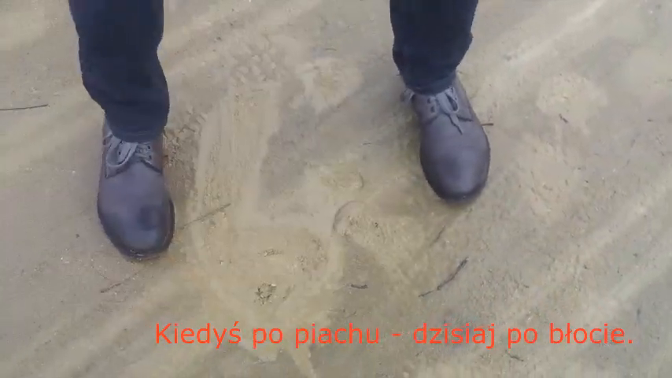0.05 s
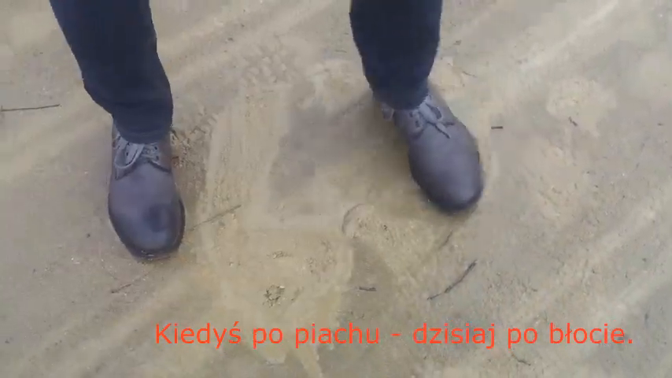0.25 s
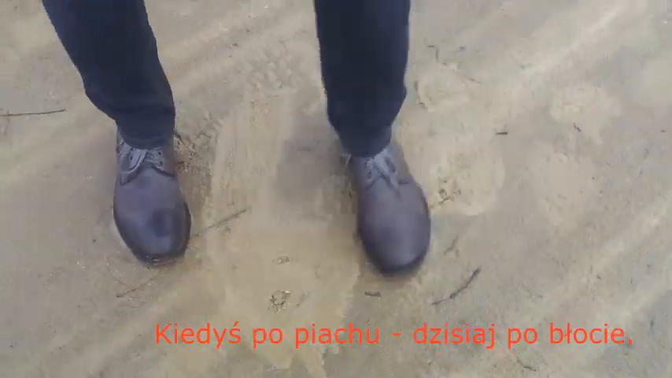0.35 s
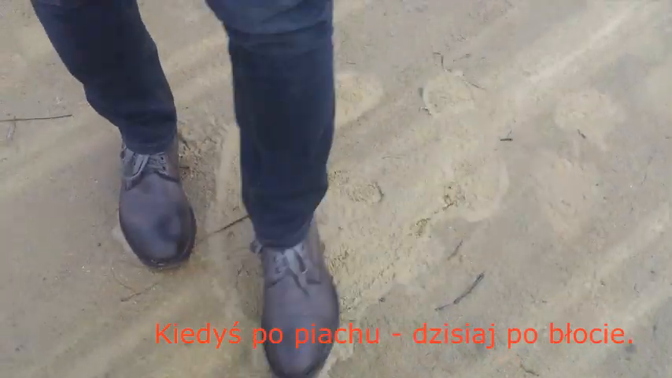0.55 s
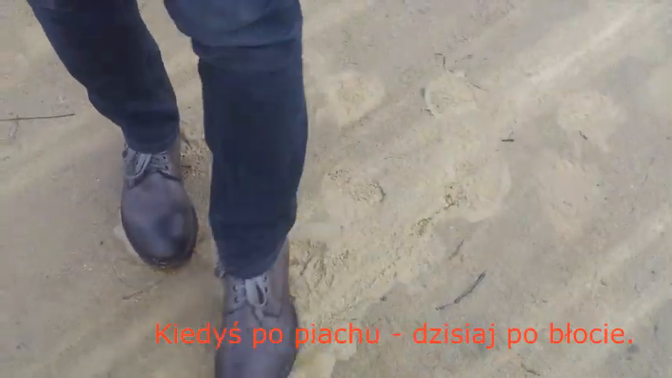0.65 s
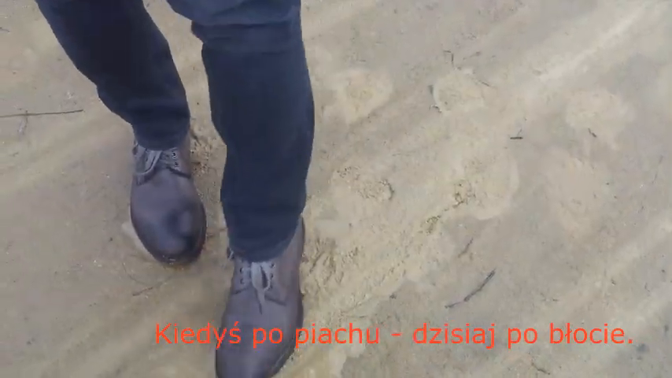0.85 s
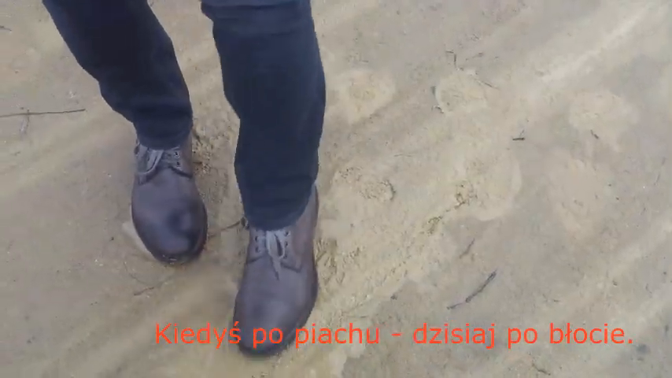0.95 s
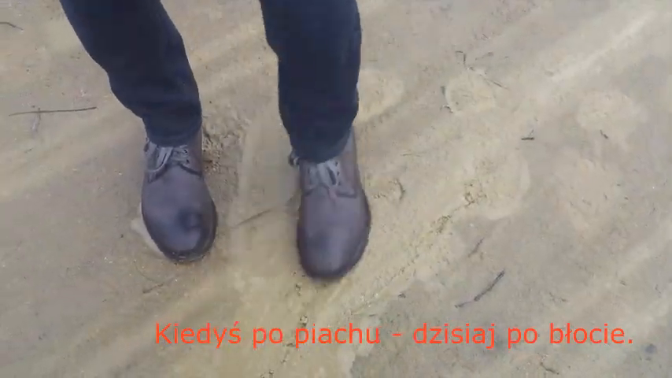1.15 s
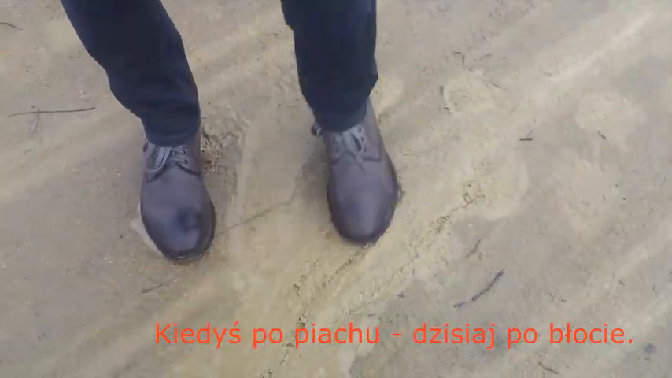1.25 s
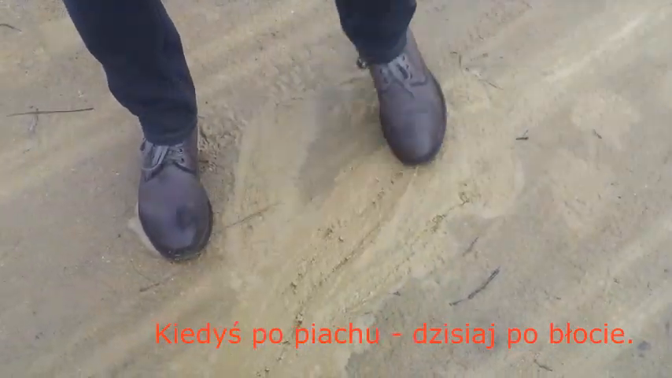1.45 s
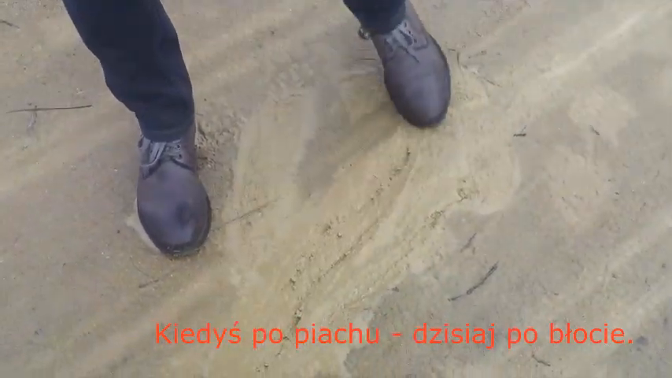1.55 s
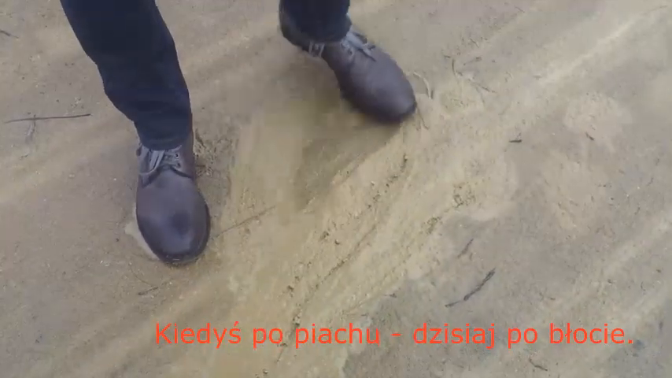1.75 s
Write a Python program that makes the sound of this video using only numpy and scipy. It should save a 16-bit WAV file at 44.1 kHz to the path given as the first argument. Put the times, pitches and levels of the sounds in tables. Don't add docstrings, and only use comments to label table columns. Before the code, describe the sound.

A shoe sole scrapes wet sand on paving, outdoors, very close in stereo. Quiet traffic hum until a light landing near 0.2 s, then a bright, crunchy drag at 0.26-0.4 s, weakening through 0.7 s. After a lull, grinding rebuilds from 0.9 s, with a sharp pebble crack at 1.12 s and gritty hissing until 1.5 s. Faint drops tick at 1.6-1.72 s; hum remains.

```python
import sys
import numpy as np
from scipy import signal
from scipy.fft import rfft, irfft, next_fast_len
from scipy.io import wavfile
from scipy.ndimage import map_coordinates

SR = 44100
rng = np.random.default_rng(int(sys.argv[2]) if len(sys.argv) > 2 else 0)


def log_audio(samples):
    frames = np.atleast_2d(samples).T
    limited = np.clip(frames, -1, 1)
    pcm = np.round(limited * 32767).astype(np.int16)
    wavfile.write(sys.argv[1], SR, pcm)


def volts_from_decibels(level):
    exponent = np.asarray(level, float) / 20
    return 10 ** exponent


N = 79380


def unit(x):
    return x / np.sqrt(np.mean(x ** 2) + 1e-20)


def along(points, hz):
    f, v = np.transpose(points)
    return np.interp(np.log(hz + 1), np.log(f + 1), v)


def curves(rows):
    s, *cols = np.transpose(rows)
    t = np.arange(N) / SR
    outside_s = np.maximum(s[0] - t, 0) + np.maximum(t - s[-1], 0)
    return [np.interp(t, s, c) for c in cols] + [-150 * outside_s]


def wobble(rate):
    knots = rng.standard_normal(int(N * rate / SR) + 4)
    return map_coordinates(knots, [np.arange(N) * rate / SR])


def filtered(x, response):
    m = next_fast_len(N + SR // 4)
    return irfft(rfft(x, m) * response(np.fft.rfftfreq(m, 1 / SR)), m)[..., :N]


def shaped(x, spectrum):
    return unit(filtered(x, lambda hz: volts_from_decibels(along(spectrum, hz))))


def spread(x, own):
    z = signal.stft(x, nperseg=256)[2]
    shifted = z * np.exp(2j * np.pi * rng.random(z.shape))
    alone = signal.istft(shifted, nperseg=256)[1][:, :N] * 1.51

    def share(hz):
        return np.clip(along(own, hz), 0, 1)

    return filtered(x, lambda hz: np.sqrt(1 - share(hz) ** 2)) + filtered(alone, share)


# time_s, right_port_lag_s
SHOE_LAG = [(0.2, 2e-5), (0.6, -5e-6), (1.0, -2.5e-5), (1.4, -5e-6)]


def grains(s, gain, hz, cycles, size):
    out, at = [], np.arange(size)
    lag = np.interp(s, *np.transpose(SHOE_LAG))
    for start in (s - lag / 2, s + lag / 2):
        first = np.ceil(start * SR).astype(int)
        place = first[:, None] + at
        turns = hz[:, None] * (place / SR - start[:, None])
        decay = volts_from_decibels(-60 * turns / (3 * cycles))
        wave = gain[:, None] * np.sin(2 * np.pi * turns) * decay
        out.append(np.bincount(np.clip(place, 0, N).ravel(), wave.ravel(), N + 1)[:N])
    return np.array(out)


def scatter(rate, size_db):
    u = rng.random((int(rate * N / SR), 3))
    times = u[:, 0] * N / SR
    sizes = volts_from_decibels(-size_db * np.log(u[:, 1] + 0.0088))
    bell = np.log(u[:, 2] / (1 - u[:, 2]) + 1e-9) / 1.54
    return times, sizes, bell


# time_s, grit_db, mud_over_grit_db, fizz_over_grit_db
STROKES = [(0.0, -48.5, -5.5, -16), (0.21, -37.5, -10.5, -44), (0.262, -19.5, -13, -68),
           (0.362, -22.5, -15, -21), (0.4, -24.5, -11.5, -51), (0.526, -27, -16.5, -26),
           (0.575, -31, -8, -20), (0.7, -31.5, -13.5, -24), (0.736, -42.5, -12, -30),
           (0.88, -31, -13.5, -26), (0.96, -27.5, -14, -23), (1.13, -21.5, -26.5, -27),
           (1.24, -23.5, -14.5, -30), (1.31, -21, -15, -24.5), (1.41, -25, -16, -21),
           (1.455, -25, -15, -16), (1.52, -32.5, -11.5, -10), (1.69, -48.5, -10, -21)]
# freq_hz, level_db
SAND_SPECTRUM = [(300, -33), (1200, -13), (3300, -7.5), (4600, -3), (6200, -0.5), (8500, -9), (11000, -20),
                 (12500, -55)]
MUD_SPECTRUM = [(60, -17), (110, -11.5), (228, 0.5), (336, -9), (550, -4.5), (900, -5.5), (1500, -8.5),
                (3000, -51)]
FIZZ_SPECTRUM = [(7000, -21), (9000, 0.5), (11000, 3), (13000, -4), (15000, -7)]


def sand():
    grit_db, mud_db, fizz_db, fade_db = curves(STROKES)
    s, gain, z = scatter(9000, size_db=2)
    crack_hz = np.clip(6500 * np.exp(0.394 * z), 800, 15000)
    cracks = unit(grains(s, gain, crack_hz, cycles=2.2, size=128))
    surge_db = bursts() + 0.4 * wobble(45.07) + 0.8 * wobble(120)
    hiss = 0.55 * cracks + 0.45 * rng.standard_normal(N)
    grit = shaped(hiss * volts_from_decibels(surge_db), SAND_SPECTRUM)
    fizz = shaped(hiss * volts_from_decibels(1.6 * surge_db + 0.42 * wobble(13)), FIZZ_SPECTRUM)
    rub = shaped(rng.standard_normal(N) * volts_from_decibels(0.71 * surge_db + 1.8 * wobble(40.6)), MUD_SPECTRUM)
    mix = volts_from_decibels(-5) * grit + volts_from_decibels(mud_db - 0.5) * rub + volts_from_decibels(fizz_db - 0.5) * fizz
    return volts_from_decibels(grit_db + fade_db) * mix


# time_s, level_db, pitch_hz
ARCH_GAP = [(0.19, -44, 1270), (0.235, -31, 1260), (0.262, -22, 2220), (0.354, -19.5, 2350),
            (0.39, -38, 1870), (0.525, -23.5, 2430), (0.555, -28, 1710), (0.635, -32, 1740),
            (0.69, -22, 2560), (0.736, -45, 2570), (0.79, -37, 2370), (0.865, -35.5, 1370),
            (0.89, -25.5, 2540), (1.0, -30.5, 2430), (1.04, -26.5, 2440), (1.15, -21, 2170),
            (1.165, -29.5, 2180), (1.4, -42.5, 2250)]


def arch():
    level_db, pitch_hz, fade_db = curves(ARCH_GAP)
    s, gain, z = scatter(1500, size_db=0.5)
    gap_hz = (pitch_hz * np.exp(0.031 * wobble(45)))[(s * SR).astype(int)]
    at_heel = rng.random(len(s)) < 0.25
    hz = np.where(at_heel, 2350, gap_hz) * np.exp(0.067 * z)
    ring = grains(s, gain, hz, cycles=12.2, size=512)
    ring = unit(ring * volts_from_decibels(1.1 * wobble(53.84) + 0.9 * wobble(130)))
    return volts_from_decibels(level_db + fade_db - 3) * ring


# freq_hz, share
SOLE_OWN = [(100, 0.28), (1000, 0.43), (2200, 0.12), (3500, 0.88), (6000, 0.5), (9000, 1), (13000, 0.85)]


def sole():
    return spread(sand() + arch(), SOLE_OWN)


def breaks(rows, gain_db, cycles, crack_db):
    s, db, hz = np.transpose(rows)[..., None]
    u = rng.random((len(rows), 3, 5))
    periods = np.round(0.0015 * hz * (np.arange(5) / 5 - 1))
    at = (s + periods / hz).ravel()
    gain = volts_from_decibels(db + gain_db - 3.05 * u[:, 0]).ravel()
    knock_hz = (hz * np.exp(0.12 * (u[:, 1] - 0.5))).ravel()
    crack_hz = 2500 + 9000 * u[:, 2].ravel()
    ring = grains(at, gain, knock_hz, cycles, size=400)
    return ring + volts_from_decibels(crack_db) * grains(at, gain, crack_hz, 1.8, size=64)


# time_s, peak_db, pitch_hz
GRIT_CRACKS = [(0.2605, -13, 5900), (0.2695, -12, 5770), (0.2873, -13, 6240), (0.2941, -9, 5740),
               (0.2995, -12, 6010), (0.3179, -12, 6200), (0.342, -16, 6930), (0.3497, -11, 6970),
               (0.363, -16, 6970), (0.3675, -8, 6150), (0.3755, -17, 6200), (0.5078, -17, 6160),
               (0.5212, -13, 6130), (0.5286, -19, 6500), (0.5444, -19, 5730), (0.5524, -21, 6640),
               (0.6083, -20, 5710), (0.6164, -22, 6650), (0.6228, -25, 6550), (0.667, -20, 6450),
               (0.6805, -20, 5880), (0.6989, -25, 5710), (0.8956, -26, 5870), (0.9053, -27, 5930),
               (0.9536, -20, 5850), (0.9626, -20, 5880), (0.9752, -18, 4670), (0.9809, -19, 5560),
               (0.9928, -15, 5560), (1.0005, -19, 5580), (1.0105, -17, 6600), (1.0197, -17, 5460),
               (1.0285, -12, 6400), (1.0364, -13, 5740), (1.0415, -16, 6570), (1.0795, -13, 5620),
               (1.0847, -17, 5510), (1.0902, -15, 5450), (1.1186, -7, 6610), (1.1332, -13, 4460),
               (1.1384, -10, 5340), (1.1479, -15, 6290), (1.1811, -14, 6280), (1.1936, -18, 6320),
               (1.2201, -18, 6370), (1.2582, -17, 7260), (1.2631, -14, 6190), (1.2876, -13, 6140),
               (1.2931, -14, 6230), (1.303, -11, 6240), (1.3114, -13, 6400), (1.3219, -11, 6200),
               (1.3387, -13, 6000), (1.3481, -16, 6210), (1.3538, -12, 6060), (1.36, -16, 6140),
               (1.4444, -18, 5950), (1.4512, -15, 5060), (1.462, -18, 6930), (1.5273, -23, 5350)]


def grit_ticks():
    return breaks(GRIT_CRACKS, gain_db=-6, cycles=7, crack_db=-13)


def bursts():
    marks = np.bincount((np.transpose(GRIT_CRACKS)[0] * SR).astype(int), minlength=N)
    at = np.arange(-1000, 1001) / SR
    swell = np.exp(-0.5 * (at / 0.004) ** 2)
    return 4.5 * np.tanh(np.convolve(marks, swell, "same"))


# time_s, peak_db, pitch_hz
CLOD_BREAKS = [(0.1989, -31, 3150), (0.2683, -15, 1930), (0.3065, -16, 2130), (0.3231, -13, 2070),
               (0.3301, -15, 2220), (0.3543, -13, 2800), (0.4016, -25, 1730), (0.4395, -21, 2190),
               (0.4981, -21, 2670), (0.5082, -20, 2270), (0.5207, -19, 2370), (0.5273, -14, 2370),
               (0.5396, -19, 2580), (0.5441, -19, 3150), (0.5589, -19, 1580), (0.5976, -19, 2160),
               (0.6036, -20, 2570), (0.6082, -19, 3150), (0.6171, -21, 3460), (0.623, -20, 1570),
               (0.6615, -19, 2140), (0.69, -19, 2290), (0.7793, -28, 2420), (0.7903, -28, 2260),
               (0.8191, -28, 1710), (0.9239, -22, 2390), (0.9309, -22, 2500), (0.9749, -24, 2370),
               (1.0292, -15, 2520), (1.0365, -17, 2720), (1.0423, -14, 2510), (1.0555, -11, 2380),
               (1.0848, -17, 2280), (1.1132, -18, 2620), (1.1343, -13, 2070), (1.1406, -13, 3060),
               (1.1562, -19, 2230), (1.1983, -21, 2240), (1.2082, -23, 2070), (1.2572, -17, 2160),
               (1.2632, -21, 2800), (1.3507, -20, 3510), (1.4544, -29, 3620), (1.4628, -29, 3590)]


def clods():
    return breaks(CLOD_BREAKS, gain_db=-6.5, cycles=6, crack_db=-16)


# start_s, peak_db, lowest_pitch_hz, length_s
STONE_SNAPS = [
    (0.18, -25.5, 1740, 0.032),
    (1.3, -15, 2120, .006),
    (1.459, -24.5, 430, 0.00445),
    (1.424, -22, 7800, .004),
    (1.524, -17, 6600, 0.0069),
]


def snaps():
    s, db, hz, length = np.transpose(STONE_SNAPS)[..., None]
    u = rng.random((len(STONE_SNAPS), 3, 14))
    at = s + length * u[:, 0] ** 2
    gain = volts_from_decibels(db - 6 - 7 * u[:, 0] - 7 * u[:, 1])
    mode_hz = hz * 2 ** (1.25 * u[:, 2])
    return grains(at.ravel(), gain.ravel(), mode_hz.ravel(), cycles=15, size=600)


def small_pieces():
    pieces = grit_ticks() + clods() + snaps()
    return filtered(pieces, lambda hz: (1j * hz / (400 + 1j * hz)) ** 2)


# start_s, peak_db, pitch_hz, length_s
PEBBLE_KNOCKS = [
    (0.2262, -29, 1180, .004),
    (1.1166, -9, 6600, .0035),
    (1.226, -36, 235, .03),
    (1.133, -17, 3150, .005),
]


def pebbles():
    s, db, hz, length = np.transpose(PEBBLE_KNOCKS)[..., None]
    at = s + np.round(length * hz * np.arange(5) / 5) / hz
    gain, knock_hz = volts_from_decibels(db + 0 * at), hz + 0 * at
    return grains(at.ravel(), gain.ravel(), knock_hz.ravel(), cycles=6, size=600)


# start_s, peak_db, pitch_hz
HEEL_DROPS = [
    (1.614, -32, 5500),
    (1.6347, -28, 5970),
    (1.6982, -27, 4330),
    (1.706, -30, 5900),
    (1.7136, -29, 7400),
    (1.7236, -35, 6000),
]


def drops():
    s, db, hz = np.transpose(HEEL_DROPS)
    tick = grains(s, volts_from_decibels(db), hz, cycles=6, size=200)
    splash = grains(s + 0.0005806, volts_from_decibels(db - 17), 1.27 * hz, cycles=6, size=200)
    return tick + splash


# first_delay_s, second_delay_s
ECHO_DELAYS = [
    [0.000924, .0017],
    [0.000704, 0.0023],
]


def echoes(x):
    high = filtered(x, lambda hz: (1j * hz / (2500 + 1j * hz)) ** 2)
    at = np.arange(N)
    late = np.zeros_like(x)
    for port, delays in enumerate(ECHO_DELAYS):
        for delay_s in delays:
            drifting_s = delay_s + 0.00006 * wobble(4.0)
            late[port] += map_coordinates(high[port], [at - SR * drifting_s], order=3)
    return x + volts_from_decibels(-9) * late


# freq_hz, level_db
FAR_SPECTRUM = [(20, -3.5), (50, 2), (120, -7.5), (400, -21.5), (2200, -14), (4500, -15.5), (8000, -29.5),
                (14600, -24)]
# freq_hz, share
FAR_ALONE = [(100, 0.42), (1000, 0.99), (4000, 0.96), (12000, 1)]


def far():
    air = filtered(rng.standard_normal(N), lambda hz: volts_from_decibels(along(FAR_SPECTRUM, hz)))
    return volts_from_decibels(-45) * unit(spread(np.array([air, air]), FAR_ALONE))


def scene():
    shoe = sole() + small_pieces() + pebbles() + drops()
    return echoes(shoe) + far()


def low_pass(x):
    return signal.sosfilt(signal.butter(12, 14790, fs=SR, output="sos"), x)


# freq_hz, width_hz, gain_db
LEFT_CAVITY = [(90, 170, 3.5), (3850, 270, -4), (6260, 3640, 6), (7770, 410, -12), (8650, 3940, 5.5)]
RIGHT_CAVITY = [(1190, 370, 2.5), (3800, 1550, 2), (5140, 880, -10), (6700, 5400, 1)]


def record(dry):
    def port(peaks, f):
        response = 1
        for c, w, db in peaks:
            stiff = c * c - f * f
            response = response * (stiff + 1j * f * w * volts_from_decibels(db / 2)) / (stiff + 1j * f * w / volts_from_decibels(db / 2))
        return response

    def microphone(f):
        low_cut = (1j * f / (15.2 + 1j * f)) ** 2
        return np.array([port(LEFT_CAVITY, f), port(RIGHT_CAVITY, f)]) * low_cut

    x = filtered(dry, microphone)
    x = x / (1 + np.abs(x / 0.79) ** 6) ** (1 / 6)
    return low_pass(x)


dry = scene()
out = record(dry)
log_audio(out)
```